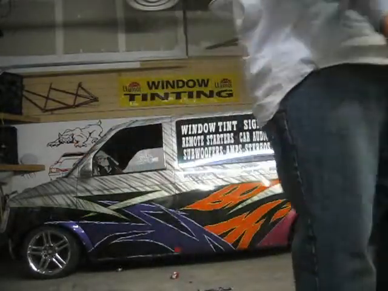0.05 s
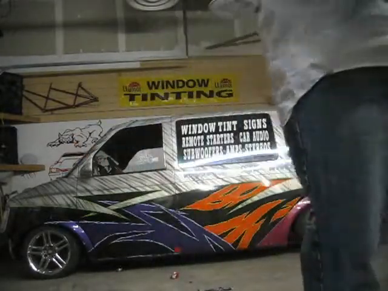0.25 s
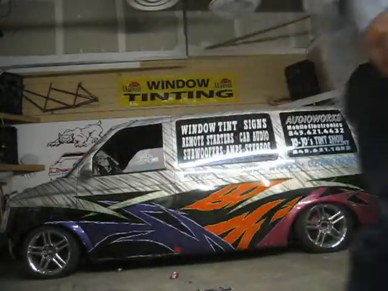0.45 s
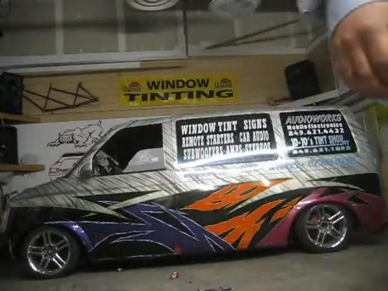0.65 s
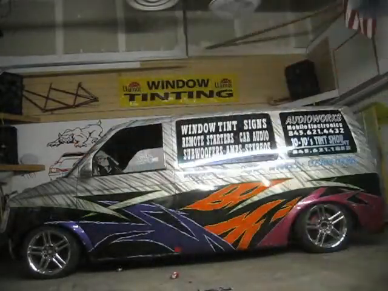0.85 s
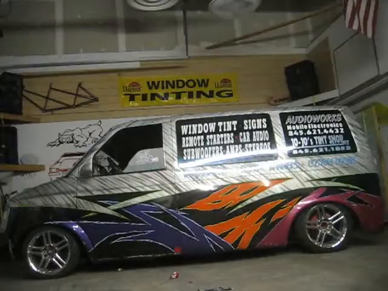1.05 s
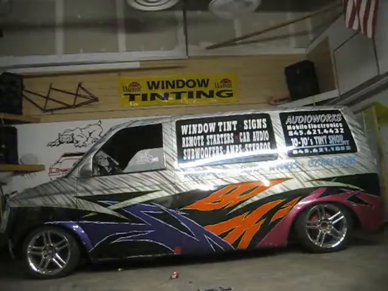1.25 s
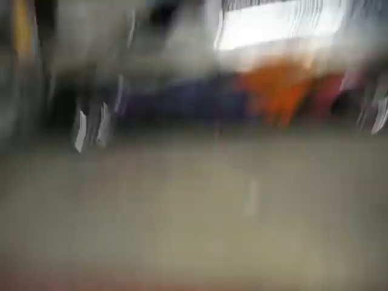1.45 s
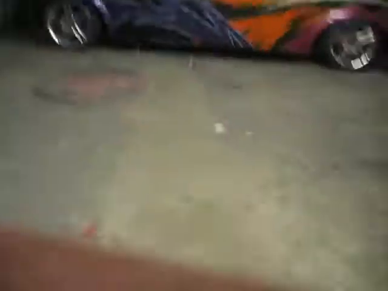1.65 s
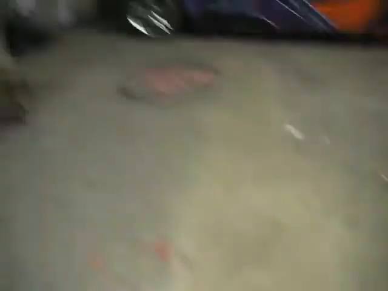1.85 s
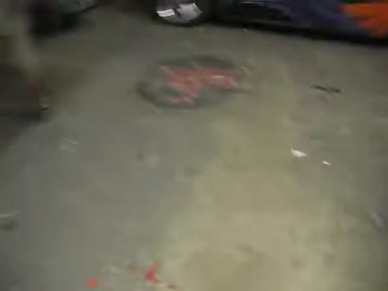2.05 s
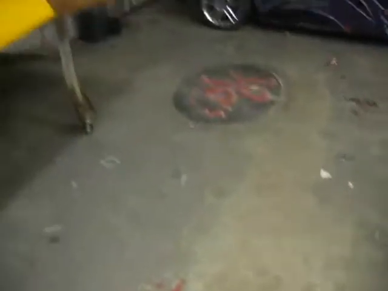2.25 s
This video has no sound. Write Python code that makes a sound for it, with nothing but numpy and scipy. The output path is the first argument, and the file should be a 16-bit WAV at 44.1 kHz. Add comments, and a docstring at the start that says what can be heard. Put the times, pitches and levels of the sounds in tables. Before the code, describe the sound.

Steady motor hum and thin whine, as shoes scuff, a click sounds and fabric rustles.

```python
"""A motor hums in a garage, with a thin whine and fan noise, heard through a small hand-held camera.
At 0.2 s and 0.8 s shoes scuff on concrete as a person steps aside. From 1.3 s clothing rustles close by.
Near 1.5 s a hand knocks the case with a thump and a sharp plastic click. Then the camera is swung down,
which changes the mix of tones in the hum, and at 2 s a shoe scuffs once more."""
import sys
import numpy as np
from scipy import signal
from scipy.fft import rfft, irfft
from scipy.io import wavfile
from scipy.ndimage import uniform_filter1d

SR = 44100
rng = np.random.default_rng(int(sys.argv[2]) if len(sys.argv) > 2 else 0)


def master_out(mix):
    """Clip the mix to full scale and print it as 16-bit PCM to the path in sys.argv[1]."""
    frames = np.transpose(np.atleast_2d(mix))
    ceiling = np.clip(frames, -1, 1)
    pcm = np.round(ceiling * 32767).astype(np.int16)
    wavfile.write(sys.argv[1], SR, pcm)


N = 105840
T = np.arange(N) / SR


def undb(db):
    """Turn decibels into a factor to multiply by."""
    return 10 ** (np.asarray(db) / 20)


def unit(x):
    """Scale a sound so that its average strength (rms) is 1."""
    return x / np.sqrt(np.mean(x ** 2))


def curve(points):
    """A volume curve through (t/s, level/dB) points."""
    return undb(np.interp(T, *np.array(points).T))


def colour(x, points, tilt_db=0):
    """Shape bass and treble by (f/Hz, level/dB) points plus a tilt per octave; strength 1."""
    octave = np.log2(np.maximum(np.fft.rfftfreq(N, 1 / SR), 1))
    hz, db = np.array(points).T
    slope = tilt_db * np.clip(octave, np.log2(hz[0]), np.log2(hz[-1]))
    gain = undb(np.interp(octave, np.log2(hz), db) + slope)
    return unit(irfft(rfft(x) * gain, N))


def lowpass(x, hz, order):
    """Soften everything above hz."""
    return signal.sosfilt(signal.butter(order, hz, fs=SR, output="sos"), x)


def cut_above(x, hz):
    """Sharply remove everything above hz."""
    return signal.sosfilt(signal.ellip(8, .2, 75, hz, fs=SR, output="sos"), x)


def drift(per_s):
    """Wander smoothly between random values; strength 1."""
    k = int(SR / per_s)
    steps = np.repeat(rng.standard_normal(N // k + 2), k)
    return unit(uniform_filter1d(uniform_filter1d(steps, k), k)[:N])


def grains(per_s, spread_db):
    """Rubbing is a stream of tiny slips of random size."""
    slips = (rng.random(N) < per_s / SR) * rng.choice([-1, 1], N)
    return slips * undb(np.minimum(spread_db * rng.exponential(size=N), 13.5))


def fade(start, t60):
    """Stay at 1 until the start, then die away. The fade time t60 is how long a 60 dB drop takes."""
    return np.exp(-np.log(1000) * np.maximum(T - start, 0) / t60)


def stroke(at, rise, hold, t60, db):
    """The volume of one rub: it rises, holds and fades."""
    return undb(db) * np.clip((T - at) / rise, 0, 1) * fade(at + rise + hold, t60)


def ring(at, hz, t60, rise_s):
    """A struck thing vibrates and dies away."""
    return np.sin(2 * np.pi * hz * (T - at)) * np.clip((T - at) / rise_s, 0, 1) * fade(at, t60)


def tone(hz, db, waver_db):
    """A lasting tone whose level wavers."""
    level = np.sqrt(2) * undb(db + waver_db * drift(4))
    return level * np.sin(2 * np.pi * (np.cumsum(hz) / SR + rng.random()))


def garage_echo(x):
    """Sound bounces off the floor and walls and blurs into a short, quiet echo."""
    tail = rng.standard_normal(N) * fade(0, t60=0.35) * (T > .008)
    return undb(-17) * signal.fftconvolve(x, tail / np.linalg.norm(tail))[:N]


# Bass and treble of the fan noise: f/Hz, relative level/dB
FAN_COLOUR = [(15, -6), (35, 5), (75, 0.5), (150, -6), (300, -3.5), (450, -9), (620, -4.5), (850, -14),
              (2000, -17.5), (3200, -16), (4400, -17), (5200, -24), (6000, -29), (7000, -52)]
# How its volume changes: t/s, relative level/dB
FAN_LEVEL = [(0, -5), (.2, -1.5), (.6, -1.5), (1.3, -0.5), (2.0, -3), (2.4, -1)]

def fan():
    """Moving air makes a steady rush over the low rumble of the room."""
    return colour(rng.standard_normal(N), FAN_COLOUR) * undb(-36.5) * curve(FAN_LEVEL)


# The tones of the whine: f/Hz, level/dB
WHINE_TONES = [(1540, -53.5), (2309, -47)]
# Volume change added to both: t/s, level/dB
WHINE_LEVEL = [(0, -13.5), (.5, -6), (.85, -3), (1.1, 0.5), (1.35, -1), (1.55, -5), (2.4, -9)]

def motor_whine():
    """The motor gives two thin, high tones that tremble together in pitch."""
    speed = 1 + 0.00201 * drift(40)
    return sum(tone(hz * speed, db, waver_db=1.7) for hz, db in WHINE_TONES) * curve(WHINE_LEVEL)


# The tones of the hum: f/Hz, level/dB, change once the camera is down/dB
HUM_TONES = [(120.2, -34.5, 1), (178.5, -51, 5.5), (239.7, -52.5, 7.5), (269.4, -37, -1.5),
             (387.4, -50, -4), (450, -51.5, 3), (481.7, -57.5, 2.5), (508.7, -55.5, -6), (536, -47.5, -7.5),
             (568, -54, -1), (599, -51, 9), (620.5, -57, -3), (655.4, -49.5, -6.5), (718.4, -58.5, 12)]
# Volume change added to them all: t/s, level/dB
HUM_LEVEL = [(0, -5.5), (.2, -3), (.45, -1.5), (.85, 0), (1.35, 0.5), (1.75, -2), (2.0, -2.5), (2.15, -5),
             (2.4, -5)]

def motor_hum():
    """Mains power and the turning shaft make tones; their levels shift as the camera is lowered."""
    speed = 1 + 0.001 * drift(4.85)
    lowered = np.interp(T, (1.66, 1.93), [0, 1])
    hum = sum(tone(hz * speed, db + change * lowered, waver_db=0.13 if hz < 300 else 2.5)
              for hz, db, change in HUM_TONES)
    return hum * curve(HUM_LEVEL)


# Shoe scrapes: t/s, rise/s, hold/s, fade/s, level/dB, treble tilt/(dB per octave), rasp f/Hz
SCUFFS = [(0.193, 0.015, 0.031, 0.37, -24.5, 0.34, 1600), (0.8078, 0.0015, 0.0076, 0.3, -30.5, 2, 1710),
          (2.02, 0.02, .026, 0.14, -23, 2.5, 2360)]
# Bass and treble of a scrape: f/Hz, relative level/dB
SCUFF_COLOUR = [(100, -0.5), (300, -2), (700, -0.5), (1250, 0), (1600, 3.5), (2800, 0.5), (3600, 3),
                (4800, 0.5), (5700, -6), (6300, -12.5), (7000, -39.5)]

def shoes():
    """Soles scrape over gritty concrete, each scrape rasping at its own pitch."""
    rasp_width_hz, rasp_db, flutter_db = 140, -9, 1.5
    out = np.zeros(N)
    for *shape, tilt, hz in SCUFFS:
        grit = colour(grains(per_s=7000, spread_db=0.5), SCUFF_COLOUR, tilt)
        resonance = signal.iirpeak(hz, hz / rasp_width_hz, fs=SR)
        rasp = unit(signal.lfilter(*resonance, grains(per_s=7000, spread_db=0.5)))
        out += stroke(*shape) * (grit + undb(rasp_db) * rasp)
    return out * undb(flutter_db * drift(220))


# Rubs of cloth: t/s, rise/s, hold/s, fade/s, level/dB, treble tilt/(dB per octave)
RUSTLES = [(1.345, .035, .01, 0.41, -33.5, 2.5), (1.409, 0.027, 0.041, 0.29, -27, -1),
           (1.528, 0.016, 0.055, 0.89, -29.5, 0.5), (1.706, 0.03, 0.047, 1, -32, 1),
           (1.855, .012, 0.0053, 0.17, -29, 3.5), (1.894, 0.0092, 0.014, 0.3, -27, 1),
           (1.969, 0.037, .03, 0.57, -32.5, 0), (2.085, 0.038, 0.16, 0.71, -47, 6),
           (2.349, 0.038, .02, .2, -38.5, 3.5)]
# Bass and treble of a rub: f/Hz, relative level/dB
CLOTH_COLOUR = [(100, 6), (350, 2.5), (700, -1.5), (1200, -2.5), (2500, -5), (4300, -2.5), (5400, -7.5),
                (6200, -15.5), (7000, -44.5)]

def clothing():
    """Fabric slides unevenly near the microphone."""
    flutter_db = 1.9
    cloth = sum(stroke(*shape) * colour(grains(per_s=6000, spread_db=2.5), CLOTH_COLOUR, tilt)
                for *shape, tilt in RUSTLES)
    return cloth * undb(flutter_db * drift(90))


# Small ticks: t/s, snap level/dB, tail level/dB, treble limit f/Hz, tail fade/s
TICKS = [(.319, -21.5, -22.5, 2900, 0.042), (1.3886, -21, -20, 4940, 0.02),
         (1.4313, -16.5, -25.5, 5000, 0.024), (1.4675, -27, -15, 4160, .015),
         (1.493, -26, -25, 2600, 0.018), (1.8686, -21, -26.5, 5500, 0.02),
         (1.9461, -7.5, -37, 3780, 0.0034), (2.0446, -2, -18.5, 4700, 0.0052)]

def ticks():
    """Grit and fabric give single snaps, each with a short crumbling tail."""
    out = np.zeros(N)
    for at, snap_db, tail_db, hz, t60 in TICKS:
        snap = lowpass(signal.unit_impulse(N, int(at * SR)), hz, order=4)
        tail = unit(lowpass(rng.standard_normal(N), hz, order=4)) * (T >= at) * fade(at, t60)
        out += undb(tail_db) * tail - undb(snap_db) * snap / snap.max()
    return out - lowpass(out, 450, order=1)  # thin out the bass


# Soft bumps: t/s, f/Hz, level/dB, fade/s
THUMPS = [(0.8094, 205, -19.5, 0.048), (1.349, 260, -19, .05), (1.4676, 128, -9.5, 0.086),
          (1.4809, 296, -14.5, 0.016), (1.4905, 48, -9, 0.094), (1.762, 135, -25, 0.087),
          (1.899, 75, -26, 0.085)]

def thumps():
    """Feet on the floor and the hand on the case set off a few slow vibrations."""
    return sum(undb(db) * ring(at, hz, t60, rise_s=0.29 / hz) for at, hz, db, t60 in THUMPS)


# The click and its small rebound: t/s, level/dB
CLICKS = [(1.4811, 2), (1.483, -16)]
# The tones the case rings with: f/Hz, level added to the click's/dB, fade/s
CASE_TONES = [(1300, -3.5, 0.0014), (1900, -1, 0.0023), (2700, 0, 0.0049), (4970, -6, 0.0032)]

def case_click():
    """The knocked plastic case rings for a few thousandths of a second."""
    return sum(undb(db + tone_db) * ring(at, hz, t60, rise_s=0.00021)
               for at, db in CLICKS for hz, tone_db, t60 in CASE_TONES)


def scene():
    """Add all the sounds into one channel; only the shoe scuffs get an echo."""
    steps = shoes()
    background = motor_hum() + motor_whine() + fan()
    return (background + steps + garage_echo(steps) + clothing() + ticks() + thumps() + case_click())[None]


def record(dry):
    """The sound loses its high treble, and the loudest peaks are flattened with a brief crackle."""
    dull = cut_above(lowpass(dry, hz=5920, order=6), hz=6800)
    return cut_above(np.clip(dull, -.7, .7), hz=16000)


dry = scene()
out = record(dry)
master_out(out)
```